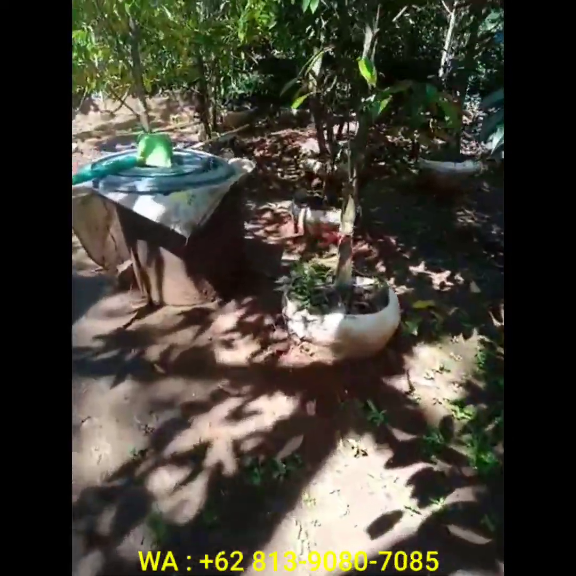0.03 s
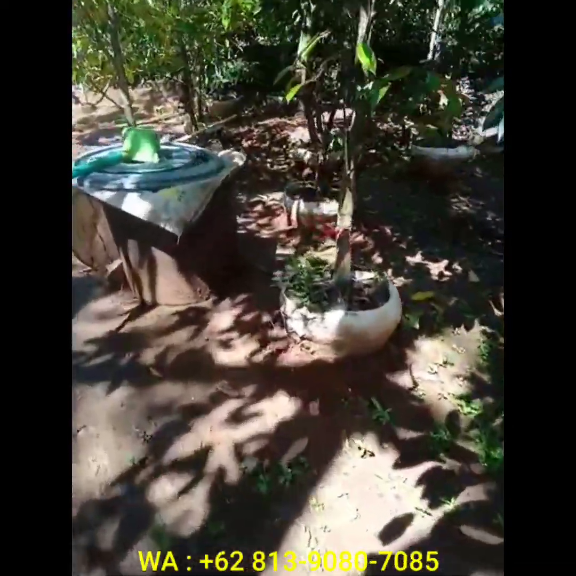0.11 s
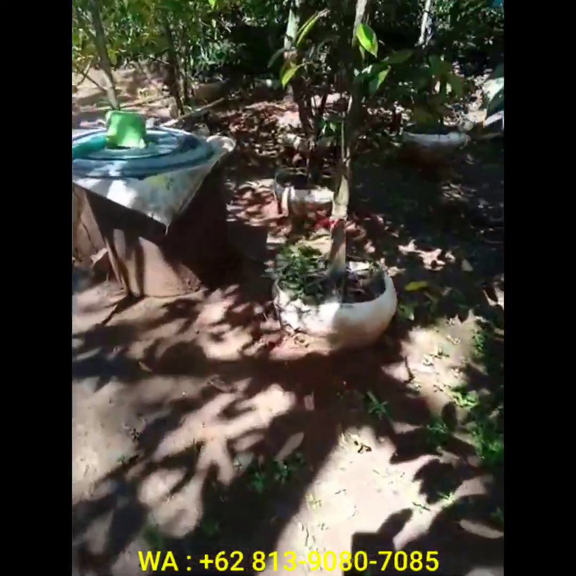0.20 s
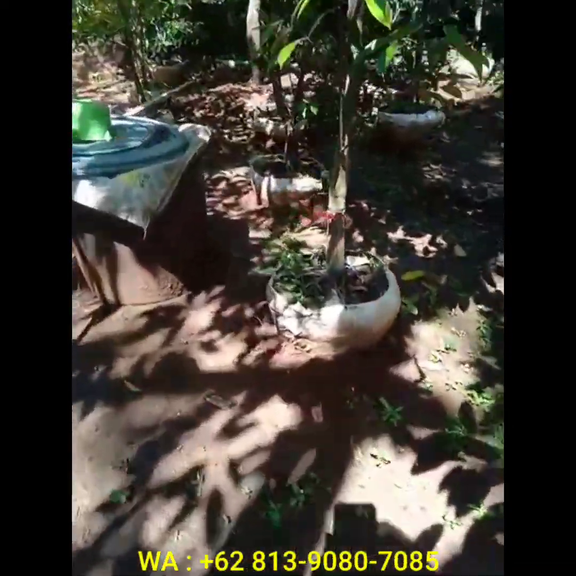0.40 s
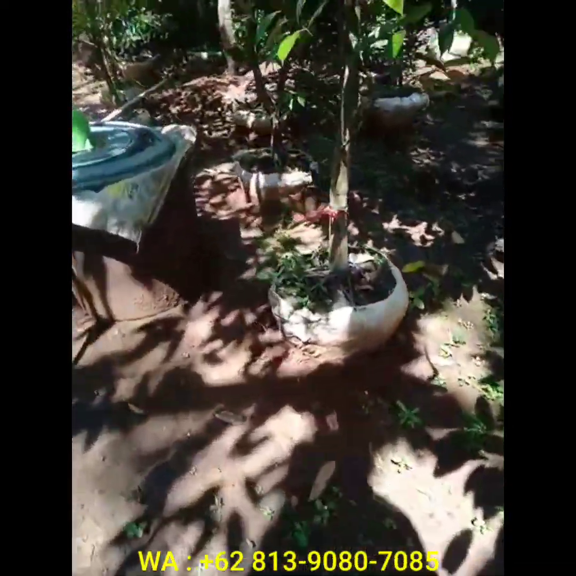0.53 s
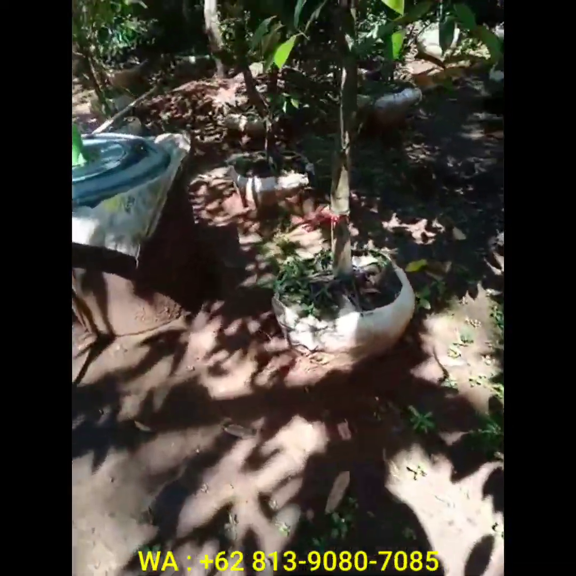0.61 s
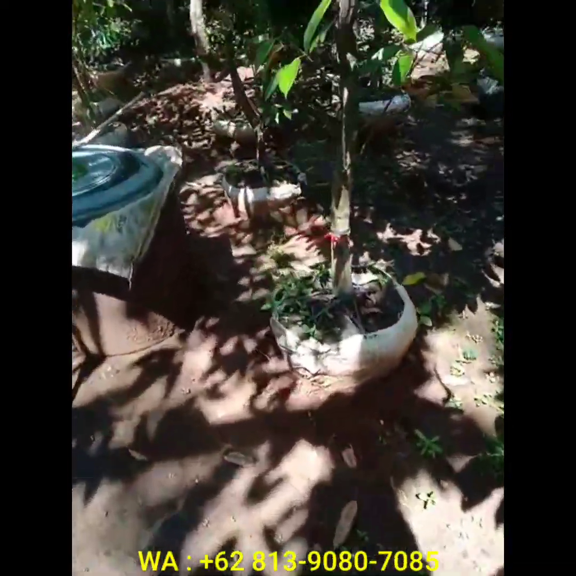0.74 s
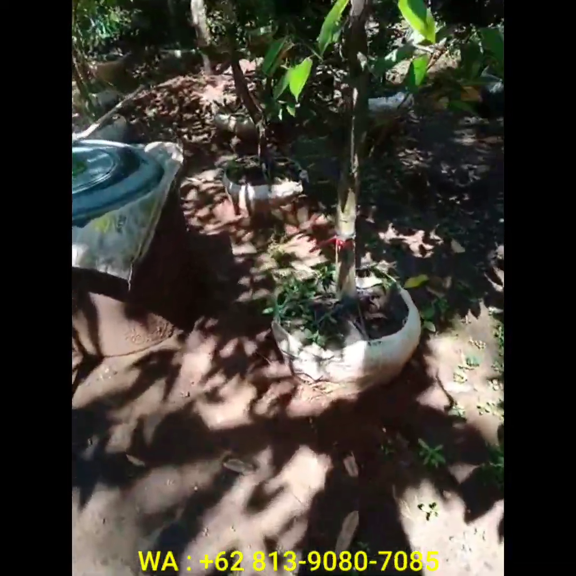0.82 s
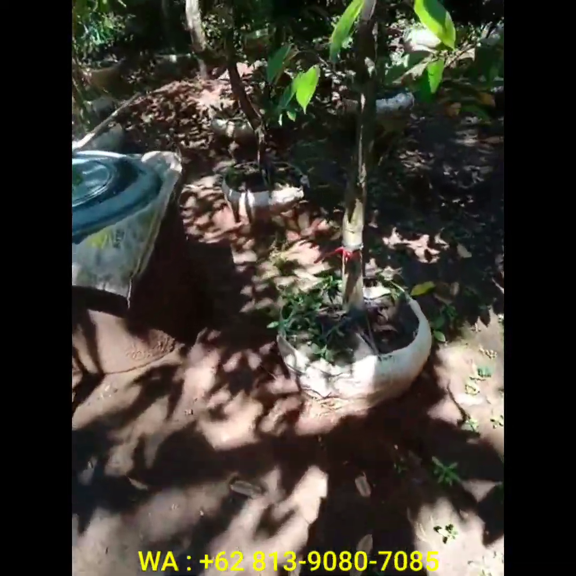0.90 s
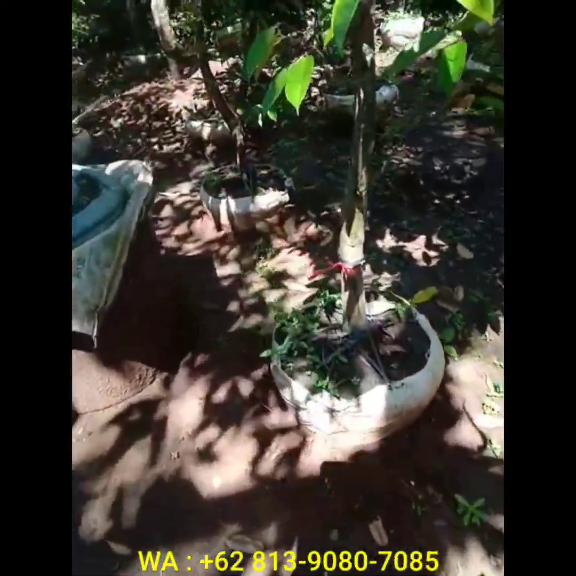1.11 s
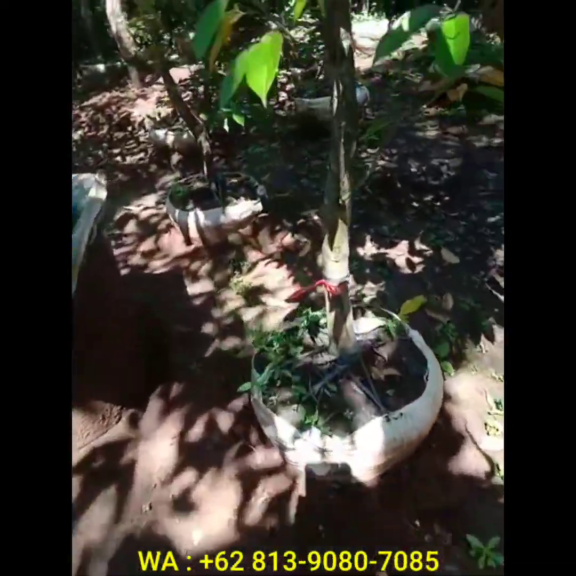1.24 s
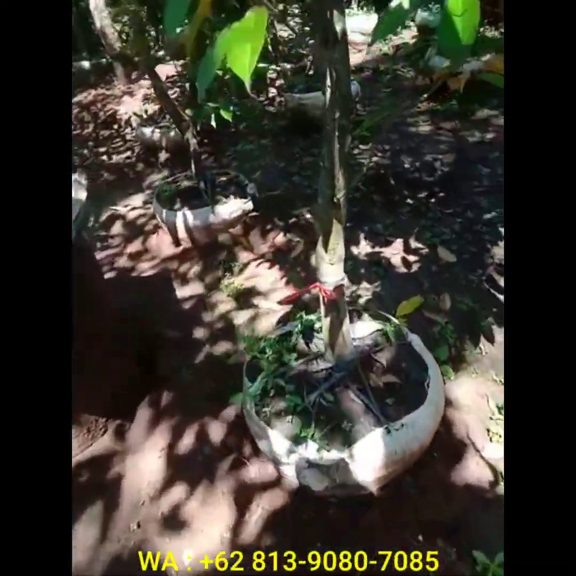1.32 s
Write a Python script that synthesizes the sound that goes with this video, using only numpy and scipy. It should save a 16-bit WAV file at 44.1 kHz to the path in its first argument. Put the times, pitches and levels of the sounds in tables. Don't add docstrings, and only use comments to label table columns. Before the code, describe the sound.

A slow walk on dry leaves over hard earth: faint rustling, one hard brittle crunch early on, a dragging rustle with scattered cracks, then quieter crackles and soft thuds. Outdoors, close handheld phone, dull treble, faint hum.

```python
import sys
import numpy as np
from scipy import signal
from scipy.fft import rfft, irfft
from scipy.io import wavfile

SR = 44100
rng = np.random.default_rng(int(sys.argv[2]) if len(sys.argv) > 2 else 0)


def volts_from_decibels(level):
    exponent = np.asarray(level, float) / 20
    return 10 ** exponent


def master_out(mix):
    frames = np.transpose(np.atleast_2d(mix))
    ceiling = np.clip(frames, -1, 1)
    pcm = np.round(ceiling * 32767).astype(np.int16)
    wavfile.write(sys.argv[1], SR, pcm)


N = 61740

# time in seconds, level in dB, tilt in dB per octave,
# fine dust above 8 kHz in dB.
FOOT_DRAG = [(0, -52, 2.5, -1), (.04, -50, 4, -4), (.11, -56.5, 2, 1), (.18, -45.5, 2, -4.5),
             (.31, -39.5, -1, 3.5), (.37, -39, -2.5, -3.5), (.44, -42, -0.5, -8), (.55, -41.5, -1, -3.5),
             (.59, -48, -3, -2.5), (.735, -52, 3.5, -5), (.77, -49, 3.5, -4.5), (.925, -46.5, 6.5, -7),
             (1.03, -57, 3, -3), (1.046, -49, 3, -2), (1.086, -46, 1.5, -1.5), (1.125, -41.5, 6.5, -3),
             (1.29, -57.5, 1.5, -2.5), (1.4, -54.5, -2.5, 14.5)]
# frequency in Hz, level in dB.
LEAF_COLOUR = [(250, -11), (600, -13), (1500, -6), (2300, 1), (4000, -3.5), (7300, -5.5), (16000, -4)]
# time in seconds, level in dB, tilt in dB per octave.
HEEL_CRUSH = [
    (.18, -60, 0),
    (.2, -39, -2),
    (0.2125, -21, 2),
    (0.238, -22.5, 3),
    (0.253, -20, 1),
    (0.276, -37, 5),
    (0.302, -40, 1),
]
# frequency in Hz, level in dB.
PILE_COLOUR = [(200, -13), (600, -1.5), (1250, -2.5), (1800, -2), (5500, -6), (7500, -6), (16000, -2.5)]
# start in seconds, peak in dB, pitch in Hz, decay in seconds.
LEAF_CRACKS = [(0.119, -44, 4000, 0.0065), (0.195, -33.5, 1330, 0.012), (0.36, -29, 11500, 0.023),
               (0.338, -36.5, 1290, 0.0058), (0.357, -32, 5630, 0.019), (0.4484, -33.5, 1591, 0.0045),
               (0.458, -30, 1750, 0.0041), (0.465, -32, 5450, 0.0046), (0.502, -27, 9500, 0.0044),
               (0.523, -29.5, 6400, 0.0064), (0.542, -28, 6500, 0.004), (0.554, -26.5, 1810, 0.0029),
               (.56, -25.5, 1110, 0.0062), (0.5606, -27, 2210, 0.006), (1.041, -40, 1510, 0.016),
               (1.091, -49, 1068, 0.017), (1.372, -34, 5750, 0.0052), (1.3726, -33.5, 2500, 0.0071),
               (1.384, -31.5, 2150, 0.0084), (1.385, -36, 494, 0.0034)]
# start in seconds, peak in dB, pitch in Hz.
FOOT_THUDS = [(0.239, -33.5, 305), (0.261, -38, 140), (0.351, -46, 94), (0.6, -47, 112),
              (0.677, -46, 140.5), (0.804, -53.5, 100), (0.906, -40, 129.4), (1.152, -38.5, 126),
              (1.304, -46.5, 108), (0.214, -48, 108), (0.502, -71, 97), (0.729, -58, 88)]
# time in seconds, level in dB, pitch in Hz.
LEAF_SCRAPE = [
    (.925, -88, 4400),
    (.945, -49, 4250),
    (.97, -50.5, 4250),
    (1.02, -54, 3900),
    (1.04, -62, 3800),
    (1.055, -100, 3800),
]
# start in seconds, level in dB, pitch in Hz, length in seconds.
LEAF_RUBS = [(.005, -55, 2310, 0.0032), (0.027, -50.5, 2510, 0.034), (0.071, -53, 592, 0.057),
             (0.134, -52, 2520, 0.03), (0.165, -46.5, 2500, 0.038), (0.23, -37, 616, 0.05),
             (0.2256, -42, 740, 0.039), (0.37, -42, 1320, 0.02), (0.584, -48, 2410, 0.037),
             (0.75, -53, 2200, 0.18), (0.77, -50.5, 3670, 0.072), (0.45, -56, 1227, 0.09),
             (0.928, -54, 4750, 0.15), (0.861, -47, 4050, 0.053), (0.901, -43, 4700, 0.037),
             (0.931, -56, 2070, 0.083), (1.048, -54.5, 1217, 0.017), (1.112, -55, 1217, 0.025),
             (1.198, -57, 1700, 0.078), (1.43, -58, 5800, 0.15), (0.763, -59, 1720, 0.058),
             (0.74, -55, 2710, 0.22), (1.192, -63.5, 1260, 0.11), (0.22, -34.5, 1290, 0.026),
             (0.26, -39, 1182, .017), (0.6, -56, 2230, .08), (0.287, -53, 1240, 0.0098),
             (0.495, -48.5, 1550, 0.046), (0.395, -48, 1720, 0.07), (.238, -37, 5500, 0.012),
             (.212, -36, 7800, 0.012), (1.035, -54, 1610, 0.032), (1.5, -49, 3000, 0.047)]
# start in seconds, peak in dB, pitch in Hz.
STEM_SNAPS = [(.1842, -26, 4000), (.2851, -12, 10000), (.3229, -17.5, 3200), (.4287, -29, 4000),
              (.5628, -23, 3000), (.8668, -29, 4500), (.9098, -27, 4500), (.9243, -29, 5000),
              (1.0445, -33, 2500), (1.0893, -26, 1400), (1.0974, -24, 7000), (1.1145, -23, 5500),
              (1.3772, -26, 2100), (1.3852, -24, 1800), (.0109, -39, 3100), (.0419, -37, 2700),
              (.0512, -37, 5200), (.2152, -15, 4500), (.2293, -14, 3500), (.2318, -14, 4000),
              (.2352, -12, 4000), (.2478, -13, 4500), (.2499, -13, 3500), (.2522, -14, 3000),
              (.2578, -14, 2500), (.4004, -30, 3100), (.4361, -32, 3100), (.5025, -26, 10000),
              (.5172, -31, 3000), (.7875, -34, 3400), (.7963, -32, 4100), (.8925, -32, 5000),
              (.906, -30, 4400), (.9143, -31, 4800), (.9292, -31, 5500), (.9358, -32, 5500),
              (.949, -34, 5800), (1.0672, -31, 6000), (1.0988, -29, 3000), (1.3858, -23, 1900),
              (1.3902, -30, 1800), (.5608, -25, 1600), (.5244, -29, 6000), (.5435, -30, 6500)]
# frequency in Hz, level in dB.
AIR_COLOUR = [(25, -33), (60, -9), (110, 2.5), (180, -6), (400, -14), (1000, -17.5), (5000, -37.5),
              (16000, -26)]
# frequency in Hz, level in dB.
SIDE_HISS = [(25, -68), (110, -54.5), (400, -59.5), (1500, -58.5), (5500, -64), (7500, -81), (10000, -60),
             (15000, -61)]
# frequency in Hz, width in Hz, gain in dB.
MIC_RESONANCES = [
    (1197.4, 35, 8.5),
    (1264, 98, 9),
    (6565, 205, -16.5),
    (6085, 2090, 6.5),
    (2540, 97, 2),
]
# frequency in Hz, gain in dB.
MIC_PORT = [(7400, 0), (8300, -11), (12000, -15), (13700, -18), (14600, -6), (15430, -4), (15520, -24),
            (15800, -34)]


def in_time(rows):
    seconds, *columns = np.transpose(rows)
    return [np.interp(np.arange(N) / SR, seconds, column) for column in columns]


def rms_one(x):
    return x / np.sqrt(np.mean(x ** 2) + 1e-20)


def bandpass(order, low_hz, high_hz, x):
    return signal.sosfilt(signal.butter(order, [low_hz, high_hz], "band", fs=SR, output="sos"), x)


def drift(rate_hz):
    r = np.exp(-2 * np.pi * rate_hz * 20 / SR)
    settled = signal.lfilter([1], [1, -2 * r, r * r], rng.standard_normal(N // 20 + 2002))[2000:]
    return np.interp(np.arange(N) / 20, np.arange(len(settled)), rms_one(settled))


def grains(per_s, spread_db, hiss):
    sizes = volts_from_decibels(spread_db * np.minimum(rng.exponential(1, N), 4)) * rng.choice([-1, 1], N)
    born = rng.random(N) < per_s * volts_from_decibels(3 * drift(60)) / SR
    return rms_one(rms_one(sizes * born) + hiss * rng.standard_normal(N))


def coloured(sources, colour, tilt_db, top_db, patchy_db, rate_hz, per_octave):
    hz_at, db_at = np.transpose(colour)
    edges = 25 * 2 ** np.arange(0, 9.4, 1 / per_octave)
    edges = edges[edges >= hz_at[0] * 0.7]
    out, total_power = 0, 0
    for k, (low, high) in enumerate(zip(edges, edges[1:])):
        hz = np.sqrt(low * high)
        level_db = np.interp(np.log(hz), np.log(hz_at), db_at)
        total_power += volts_from_decibels(2 * level_db) * (high - low) * 2 / SR
        moved_db = tilt_db * np.log2(min(hz, 6000) / 3000) + top_db * (hz > 8000)
        moved_db = moved_db + patchy_db * drift(rate_hz)
        out = out + volts_from_decibels(level_db + moved_db) * bandpass(2, low, high, sources[k % 2])
    return out / np.sqrt(total_power)


def shaped(x, colour):
    hz, db = np.transpose(colour)
    f = np.arange(N // 2 + 1) * SR / N + 1
    return irfft(rfft(x) * volts_from_decibels(np.interp(np.log(f), np.log(hz), db)), N)


def peak(x, hz, width_hz, db):
    a, w = volts_from_decibels(db / 2), 2 * np.pi * hz / SR
    k = np.sin(w) * width_hz / hz / 2
    boost = [1 + k * a, -2 * np.cos(w), 1 - k * a]
    return signal.lfilter(boost, [1 + k / a, -2 * np.cos(w), 1 - k / a], x)


def drag():
    level_db, tilt_db, dust_db = in_time(FOOT_DRAG)
    rustle = [grains(per_s=3000, spread_db=3.5, hiss=0.82) for _ in range(2)]
    unsteady = volts_from_decibels(level_db + 1.68 * drift(23.4))
    return unsteady * coloured(rustle, LEAF_COLOUR, tilt_db, dust_db, patchy_db=1.6, rate_hz=24.0,
                               per_octave=7)


def crush():
    level_db, tilt_db = in_time(HEEL_CRUSH)
    t = np.arange(N) / SR
    to_nearest_end = np.minimum(t - HEEL_CRUSH[0][0], HEEL_CRUSH[-1][0] - t)
    gate = np.clip(to_nearest_end / 0.017, 0, 1)
    burst = [grains(per_s=5100, spread_db=4.5, hiss=0.5) for _ in range(2)]
    return gate * volts_from_decibels(level_db) * coloured(burst, PILE_COLOUR, tilt_db, 0, patchy_db=2.0, rate_hz=60.0,
                                           per_octave=7)


def cracks():
    out, t = np.zeros(N + 4096), np.arange(4096) / SR
    for (s, db, hz, decay_s), noise in zip(LEAF_CRACKS, rng.standard_normal((len(LEAF_CRACKS), 4096))):
        envelope = (1 - np.exp(-t / 0.00012)) * np.exp(-(t / decay_s) ** 0.94)
        spray = noise * np.abs(noise) ** 0.5 * envelope
        low_hz, high_hz = hz / 1.47, min(hz * 1.3, 16000)
        resonance = bandpass(1, low_hz, high_hz, bandpass(1, low_hz, high_hz, spray))
        crack = resonance + 0.18 * bandpass(1, 500, 12000, spray)
        i = int(s * SR)
        out[i:i + 4096] += volts_from_decibels(db) * crack / np.abs(crack).max()
    return out[:N]


def thuds():
    out, t, cycles = np.zeros(N), np.arange(N) / SR, 4.77
    for s, db, hz in FOOT_THUDS:
        progress = np.clip((t - s) * hz / cycles, 0, 1)
        swell = np.sin(np.pi * progress ** 0.71) ** 2
        out += volts_from_decibels(db) * swell * np.sin(2 * np.pi * cycles * progress)
    return out


def scrape():
    level_db, hz = in_time(LEAF_SCRAPE)
    width_hz = 300
    lowpass = signal.butter(2, width_hz / 2, fs=SR, output="sos")
    low = signal.sosfilt(lowpass, rng.standard_normal((2, N)))
    phase = 2 * np.pi * np.cumsum(hz) / SR
    return volts_from_decibels(level_db) * rms_one(low[0] * np.cos(phase) + low[1] * np.sin(phase))


def rubs():
    out, t = 0, np.arange(N) / SR
    spread = 1 + 0.063
    for (s, db, hz, length_s), noise in zip(LEAF_RUBS, rng.standard_normal((len(LEAF_RUBS), N))):
        progress = np.clip((t - s) / length_s, 0, 1)
        swell = np.sin(np.pi * progress ** 0.7) ** 0.8
        out = out + volts_from_decibels(db) * swell * rms_one(bandpass(2, hz / spread, hz * spread, noise))
    return out


def snaps():
    ring_cycles, tail_db, tail_s = 0.7, -9, 0.003
    out, t = np.zeros(N + 1024), np.arange(1024) / SR
    for (s, db, hz), noise in zip(STEM_SNAPS, rng.standard_normal((len(STEM_SNAPS), 1024))):
        click = -np.sin(2 * np.pi * hz * t) * np.exp(-t * hz / ring_cycles)
        dull_noise = signal.lfilter([1], [1, -np.exp(-2 * np.pi * hz / SR)], noise)
        tail = dull_noise * np.exp(-t / tail_s) * (1 - np.exp(-t * hz / 2))
        snap = click / np.abs(click).max() + volts_from_decibels(tail_db) * tail / np.abs(tail).max()
        thinned = signal.lfilter(*signal.butter(2, hz / 5, "high", fs=SR), snap)
        i = int(s * SR)
        out[i:i + 1024] += volts_from_decibels(db) * thinned
    return out[:N]


def air():
    noise = rng.standard_normal((2, N))
    return volts_from_decibels(-54) * coloured(noise, AIR_COLOUR, 0, 0, patchy_db=-1.0, rate_hz=5.2, per_octave=4)


def side_hiss():
    return shaped(rng.standard_normal(N), SIDE_HISS)


def scene():
    mid = drag() + crush() + cracks() + thuds() + scrape() + air() + rubs() + snaps()
    side = side_hiss()
    return np.array([mid + side, mid - side])


def low_pass(x):
    return signal.sosfilt(signal.butter(12, 16750, fs=SR, output="sos"), x)


def record(dry):
    x = shaped(dry, MIC_PORT)
    for hz, width_hz, db in MIC_RESONANCES:
        x = peak(x, hz, width_hz, db)
    return low_pass(x)


dry = scene()
out = record(dry)
master_out(out)
```